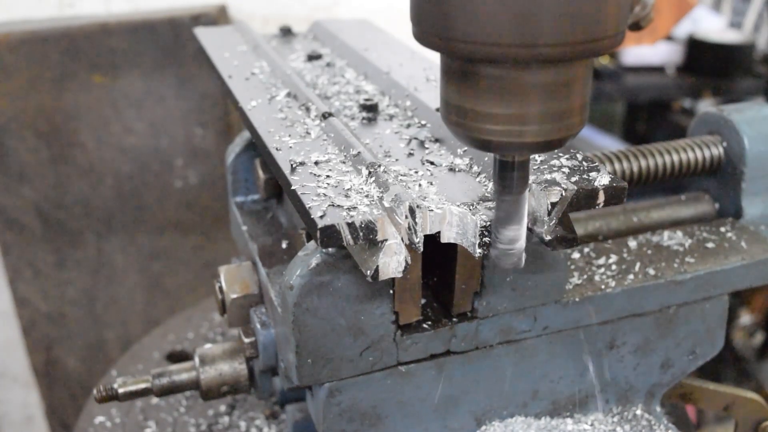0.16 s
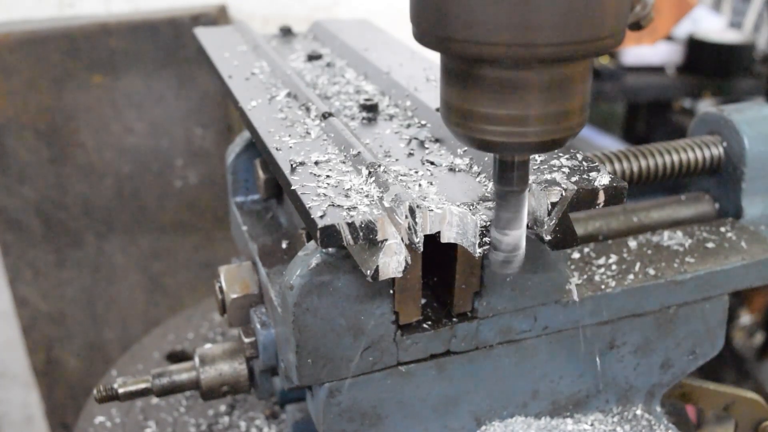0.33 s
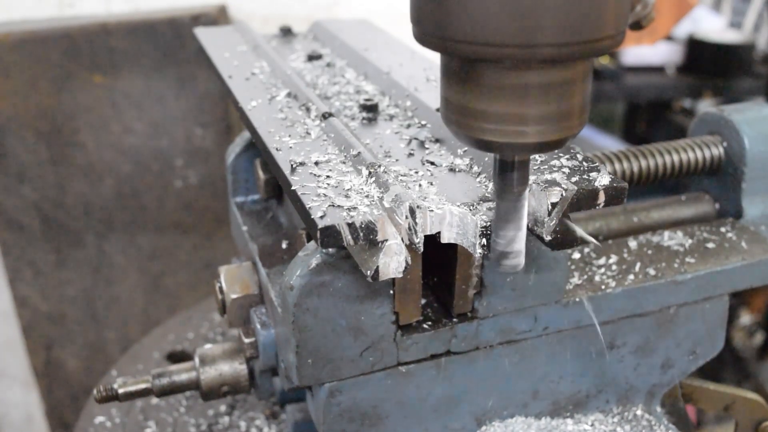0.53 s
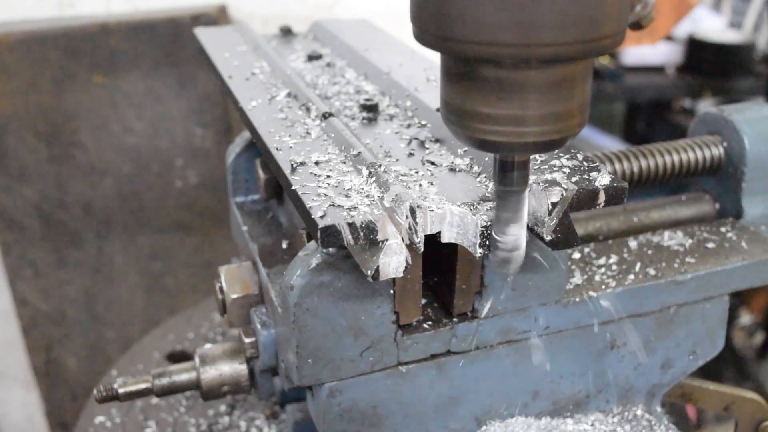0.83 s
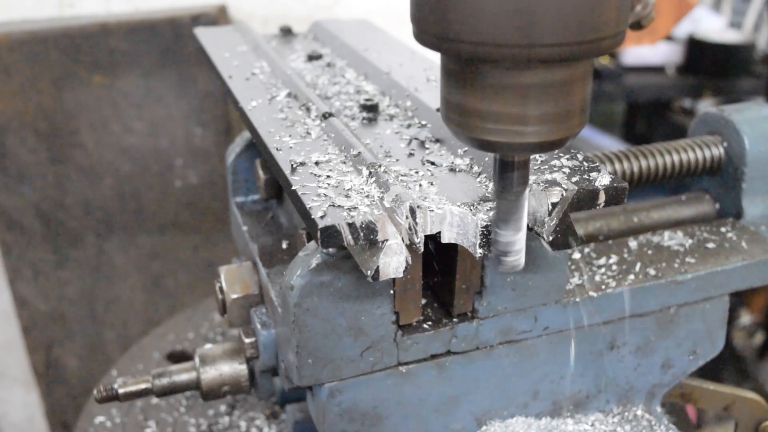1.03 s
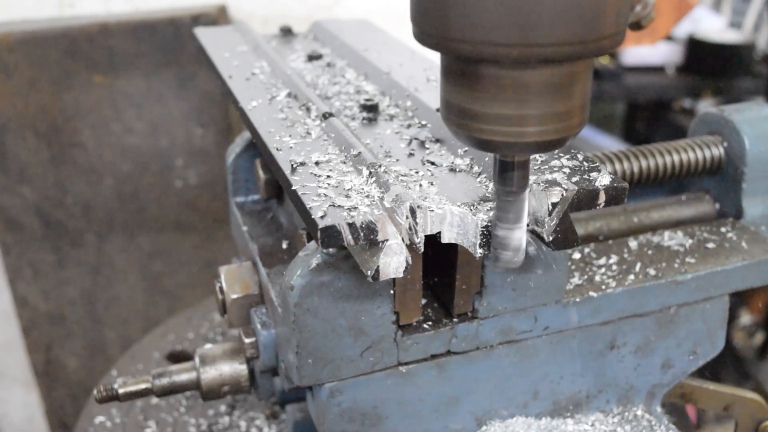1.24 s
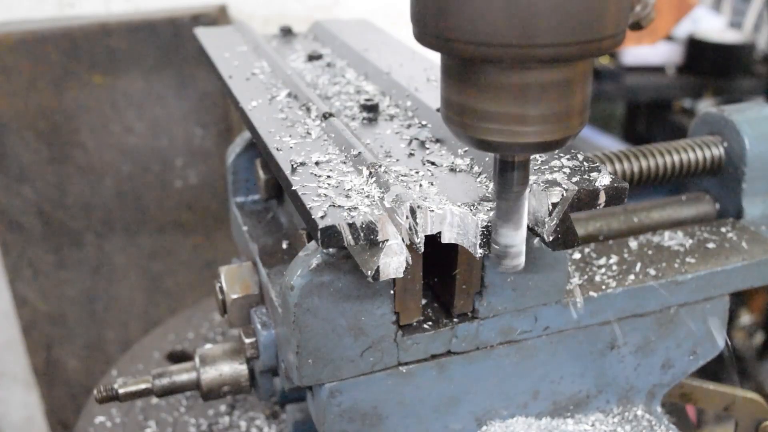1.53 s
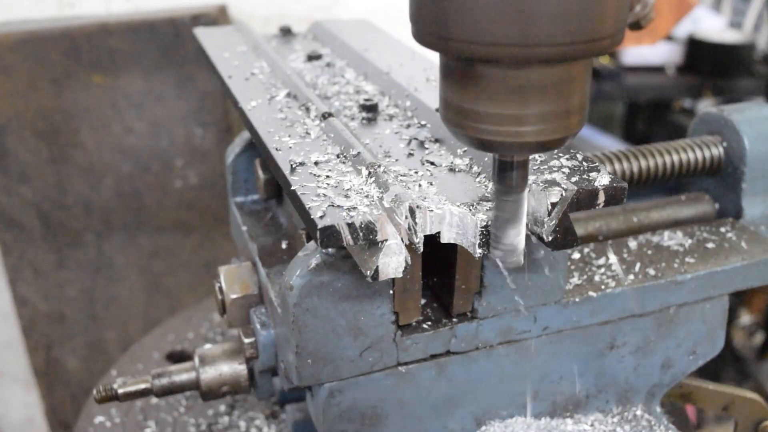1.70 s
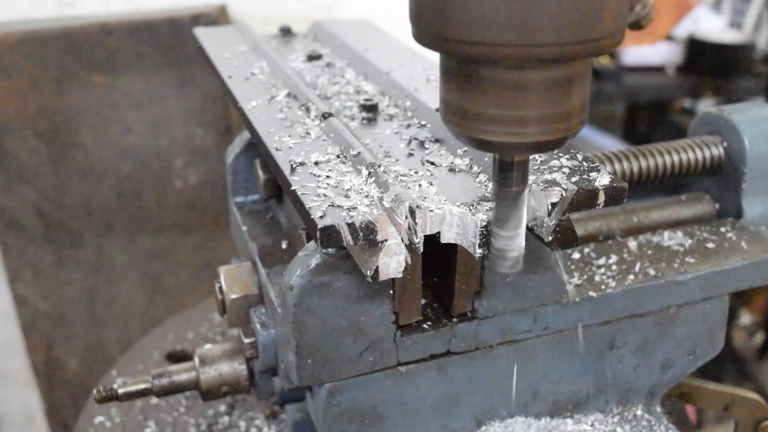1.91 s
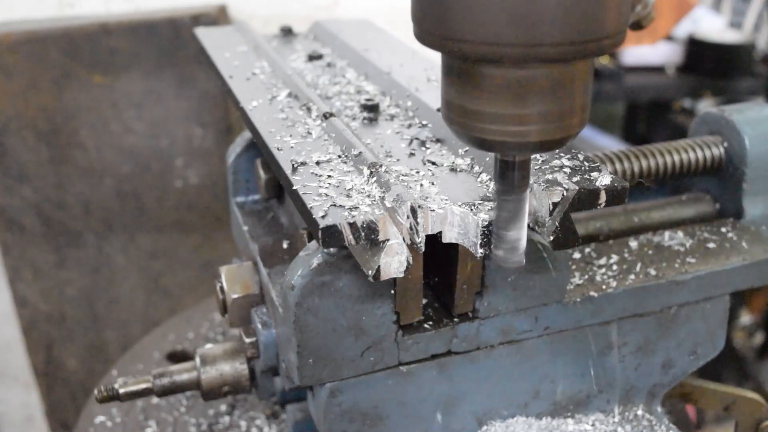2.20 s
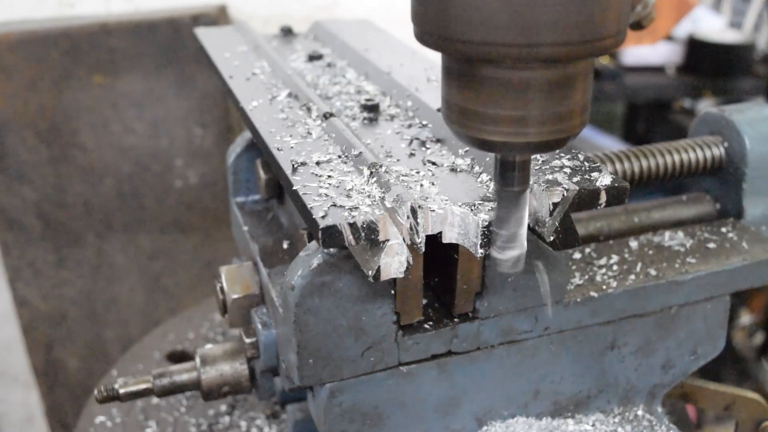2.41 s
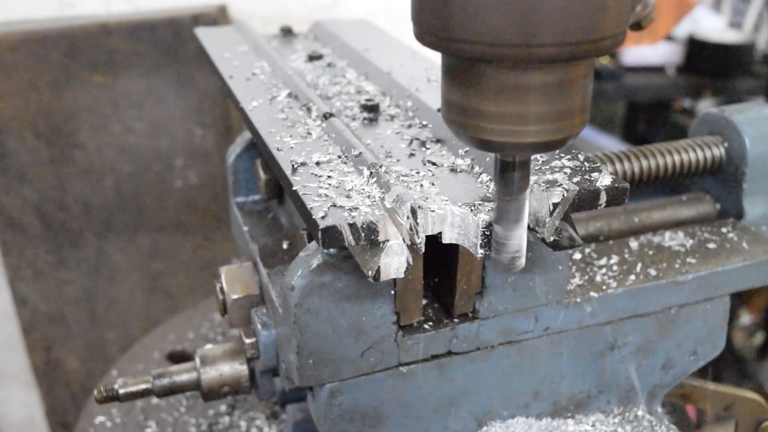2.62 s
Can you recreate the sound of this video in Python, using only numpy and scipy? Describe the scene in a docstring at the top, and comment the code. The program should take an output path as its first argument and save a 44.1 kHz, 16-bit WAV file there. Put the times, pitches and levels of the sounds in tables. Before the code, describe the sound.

A drill press mills a metal plate in a vise with a fast, pulsing rasp and a wavering ring. The motor hums beneath while small chips tinkle and sharp ticks ring out, heard close up at a workshop bench.

```python
"""A pulsing metallic rasp over a wavering ring: a drill press mills a plate with a four-flute cutter.
Each flute strikes and scrapes, exciting the resonances of the plate in its vise. Column, vise and
bench vibrate at multiples of the spindle rate, column and vise swelling as the feed presses harder.
The motor hums beneath, chips tinkle off, and hard bites and tooth ticks ring out briefly.
A small microphone close by drops the deep bass."""
import sys
import numpy as np
from scipy import signal
from scipy.fft import rfft, irfft
from scipy.io import wavfile
from scipy.ndimage import uniform_filter1d

SR = 44100
rng = np.random.default_rng(int(sys.argv[2]) if len(sys.argv) > 2 else 0)


def int16_out(signal):
    """Quantize to a 16-bit WAV file."""
    q = np.round(np.clip(np.atleast_2d(signal).T, -1, 1) * 32767)
    wavfile.write(sys.argv[1], SR, q.astype(np.int16))


N = 121275

SPINDLE_HZ, FIRST_FLUTE_S = 21.92, .0235
PING_SAMPLES = 2000
# ringing of the machine: (time [s], column level [dB], vise level [dB], run-out level [dB])
RING_LEVELS = [(0.0, -48, -35, -37.5), (0.12, -62, -70, -37), (0.14, -46, -59, -64),
               (0.24, -32.5, -40, -41), (0.45, -60, -40, -47), (0.48, -55, -61, -55), (0.54, -57, -56, -49),
               (0.6, -50, -69, -43), (0.69, -38, -47, -50), (0.76, -46, -39, -41), (0.8, -39, -56, -50),
               (0.84, -58, -45, -41), (0.91, -35, -37, -40.5), (1.09, -33, -34.5, -38.5),
               (1.19, -32.5, -48, -56), (1.25, -42, -46, -37.5), (1.36, -32, -45, -39),
               (1.39, -37, -73, -54), (1.48, -35.5, -54, -42), (1.51, -42.5, -57, -44),
               (1.71, -44, -37.5, -41), (1.81, -37.5, -47, -44), (1.83, -33.5, -48, -51),
               (1.88, -41, -63, -54), (1.94, -31, -40, -48), (2.01, -32, -44, -41), (2.07, -24.5, -32, -44),
               (2.14, -29.5, -42, -36), (2.17, -23.5, -29.5, -45), (2.24, -29, -37, -37),
               (2.29, -26.5, -33, -36), (2.4, -39.5, -35, -41), (2.44, -30.5, -34, -33),
               (2.63, -41, -45, -47), (2.67, -39, -51, -42), (2.75, -43, -47, -52)]


def amp(db):
    """Decibels to amplitude."""
    return 10 ** (np.asarray(db) / 20)


def unit_rms(x):
    """Normalisation to rms 1."""
    return x / np.sqrt(np.mean(abs(x) ** 2) + 1e-20)


def curve(table, column):
    """Linear interpolation of one column over time."""
    table = np.array(table)
    return np.interp(np.arange(N) / SR, table[:, 0], table[:, column])


def drift(rate_hz):
    """Low-pass noise: a smooth random drift of rms 1."""
    hz = np.fft.rfftfreq(N, 1 / SR)
    return unit_rms(irfft(rfft(rng.standard_normal(N)) * np.exp(-(hz / rate_hz) ** 2), N))


def coloured_noise(spectrum, patch_db):
    """Spectral shaping: noise of rms 1 whose level varies in patches of time and frequency."""
    frames, bin_hz = N // 256 + 5, np.fft.rfftfreq(1024, 1 / SR)
    real, imag, patches = rng.standard_normal((frames, 513, 3)).T
    patches = unit_rms(uniform_filter1d(uniform_filter1d(patches, size=14, axis=0), size=6, axis=1))
    hz, db = np.transpose(spectrum)
    colour_db = np.interp(np.log(bin_hz + 1), np.log(hz), db)[:, None]
    bins = (real + 1j * imag) * amp(colour_db + patch_db * patches)
    return unit_rms(signal.istft(bins, nperseg=1024, noverlap=768)[1][:N])


def resonate(x, hz, width_hz):
    """Resonance: a double pole gives steep skirts and unit gain at the centre."""
    carrier = np.exp(2j * np.pi * hz * np.arange(len(x)) / SR)
    r = np.exp(-np.pi * width_hz / SR)
    return 2 * (carrier * signal.lfilter([(1 - r) ** 2], [1, -2 * r, r * r], x / carrier)).real


def ping(hz, t60):
    """Free vibration: one struck mode decays exponentially."""
    t = np.arange(PING_SAMPLES) / SR
    return np.minimum(t / 0.00034, 1) * amp(-60 * t / t60) * np.sin(2 * np.pi * hz * t)


def impacts(events, t60, modes=((1, 1),)):
    """Modal superposition: each impact rings the modes, given as (frequency ratio, gain)."""
    out = np.zeros(N + PING_SAMPLES)
    for start, db, hz in events:
        ring = sum(gain * ping(hz * ratio, t60) for ratio, gain in modes)
        out[round(start * SR):][:PING_SAMPLES] += amp(db) * ring
    return out[:N]


def turns():
    """Uniform rotation: the spindle angle in turns."""
    return SPINDLE_HZ * (np.arange(N) / SR - FIRST_FLUTE_S) + 1


def spindle_tones(orders, level_db):
    """Modulation: every fourth order is a flute harmonic; the off-centre cutter adds sidebands."""
    runout_peak, phase_spread = 0.045, .15  # turns
    tones = 0
    for order, db in orders:
        waver = 1 + .13 * (drift(rate_hz=5) + 1j * drift(rate_hz=5))  # in strength and phase
        sideband = (order + 1) % 4 - 1
        slip = (sideband != 0) * phase_spread * rng.standard_normal()
        phase = order * turns() + slip - runout_peak * sideband
        tones += amp(db) * (waver * np.exp(2j * np.pi * phase)).real
    return amp(level_db) * unit_rms(tones)


def machine_ring():
    """Forced vibration: column, vise and cutter run-out sound at multiples of the spindle rate."""
    # partials of each: (spindle order, relative level [dB])
    column = [(35, -14), (36, 0), (37, -18), (38, -17), (39, -13), (40, -13), (41, -13), (44, -22),
              (48, -17)]
    vise = [(28, -11), (32, 0)]
    runout = [(29, -18), (30, -6), (31, 0)]
    return sum(spindle_tones(orders, curve(RING_LEVELS, k))
               for k, orders in enumerate([column, vise, runout], start=1))


def bench_ring():
    """Structure-borne sound: table and bench carry low spindle orders and a resonant rasp."""
    # bench partials: (spindle order, relative level [dB])
    orders = [(20, -4), (21, -9), (22, -7), (23, -7), (24, 0), (28, -7)]
    # bench vibration: (time [s], level [dB])
    levels = [(0.03, -50.5), (0.14, -45), (0.16, -50), (0.3, -45), (0.46, -50.5), (0.56, -41.5),
              (0.58, -42), (0.67, -46), (0.69, -41.5), (0.78, -46), (1.17, -44), (1.59, -47), (1.84, -45.5),
              (1.94, -47.5), (2.31, -47), (2.72, -44.5)]
    level_db = curve(levels, 1)
    rasp = unit_rms(resonate(rng.standard_normal(N), hz=509, width_hz=84))
    return spindle_tones(orders, level_db) + amp(level_db - 3) * rasp


def plate(drive, load_db):
    """Modal response of plate and vise; the low modes swell slightly with the load."""
    # resonances: (frequency [Hz], width [Hz], relative level [dB])
    modes = [(683.7, 29, -8), (862, 147, -2.5), (1042, 260, -6), (1428, 550, -3.5), (2040, 348, 0.5),
             (2280, 245, -3.5), (2658, 630, 1), (3430, 124, -15)]
    out = 0
    for k, (hz, width, db) in enumerate(modes):
        swell_db = 0.028 * load_db * (hz < 1200)
        out += (-1) ** k * amp(db + swell_db) * unit_rms(resonate(drive, hz, width))
    return unit_rms(out)


def cutter():
    """Impact and friction: each flute strikes, then scrapes the plate; a sizzle pulses just behind."""
    # uneven bite of the four flutes: (relative level [dB])
    flute_db = [5, 8.5, -4, 4.5]
    # strike of each flute, two standing proud: (relative level [dB])
    strike_db = [1.5, -2.5, 2, -3]
    # cutting noise: (time [s], scrape level [dB], low sizzle level [dB], high sizzle level [dB])
    levels = [(0.04, -28.5, -34.5, -42), (0.79, -29.5, -37, -43), (1.09, -27.5, -34.5, -40.5),
              (1.27, -30, -35.5, -46), (1.28, -33, -36, -41), (1.3, -26, -30.5, -39),
              (1.31, -29.5, -36.5, -43.5), (1.39, -29, -33, -41), (1.43, -30, -36.5, -41.5),
              (1.82, -30, -36, -42.5), (1.98, -28.5, -36.5, -42), (2.22, -25, -31.5, -39),
              (2.3, -27, -34.5, -43), (2.34, -26, -33.5, -39), (2.64, -30, -39, -42.5),
              (2.7, -31, -37.5, -43)]
    # friction sizzle: (frequency [Hz], relative level [dB])
    spectrum = [(1760, -33), (3000, -1.5), (3190, 0.5), (3490, 9), (4010, 1), (4360, 4), (5080, -1),
                (5750, 2), (7330, -8.5), (7960, -1), (9080, 0), (12700, -13.5), (14500, -12)]
    rise, decay = 0.36, 0.44  # shares of a flute's pass
    passes, place = np.floor(4 * turns()).astype(int), 4 * turns() % 1
    flute = passes % 4
    scatter = np.clip(rng.standard_normal((passes.max() + 1, 4)), -2, 2)[passes].T
    envelope = np.minimum(place / rise, 1) * np.exp(-place / decay)
    bite = amp(np.array(flute_db)[flute] + 1.8 * scatter) * envelope

    column_db = curve(RING_LEVELS, 1)
    load_db = uniform_filter1d(column_db - column_db.mean(), size=4000)  # follows the column's ring
    strikes = np.diff(passes, prepend=passes[0]) * amp(np.array(strike_db)[flute] + 0.5 * scatter[1])
    friction = (1 + bite[0]) * rng.standard_normal(N)
    drive = unit_rms(friction) + amp(-8.5 + .38 * load_db) * unit_rms(strikes)

    sizzle = coloured_noise([(1500, -23.0)] + spectrum[1:], patch_db=0.5)  # faint up to 1500 Hz
    low_band = signal.oaconvolve(sizzle, signal.firwin(63, 7000, fs=SR), "same")
    low_sizzle = unit_rms((1 + np.roll(bite[2], 60)) * low_band)
    high_sizzle = unit_rms((1.4 + np.roll(bite[3], 200)) * (sizzle - low_band))
    layers = [plate(drive, load_db), low_sizzle, high_sizzle]
    return sum(amp(curve(levels, k)) * layer for k, layer in enumerate(layers, start=1))


def small_chips():
    """Shot noise: chips break off at random and ring the high modes of cutter and plate."""
    # high modes: (frequency [Hz], relative level [dB])
    modes = [(3400, -11), (4430, -1), (5190, 3.5), (5600, -0.5), (6420, -2.5), (6900, -1.5), (7720, -3),
             (8120, -3), (8840, -10.5), (9760, -11), (11400, -16.5)]
    chips_per_s, detune = 2200, 0.03
    size_db = -39 + 2 * np.minimum(rng.exponential(1, N), 3)
    impulses = amp(size_db) * (rng.random(N) < chips_per_s / SR)
    struck_mode = rng.integers(0, 3 * len(modes), N)
    out = np.zeros(N)
    for k, (hz, db) in enumerate(3 * modes):  # three tunings of each mode
        tone = amp(db) * ping(hz * (1 + detune * rng.standard_normal()), t60=0.018)
        out += signal.oaconvolve(impulses * (struck_mode == k), tone)[:N]
    return out


def motor():
    """Line and continuous spectra: hum tones over the rumble of motor, belt and bearings."""
    # tones of motor and drive: (frequency [Hz], rms level [dB], waver [dB])
    lines = [(240, -46, .9), (263.4, -50.5, 2.5), (330, -60, 1.5), (350, -62, 1.5), (176, -68, 2),
             (155, -75, 2), (220, -65, 2), (286, -64, 2), (395, -64, 3), (417, -65, 3)]
    # rumble spectrum: (frequency [Hz], relative level [dB])
    rumble = [(30, -62), (60, -62), (100, -60), (140, -40), (190, -12), (290, -4), (400, -8), (560, -6.5),
              (730, 4), (1000, 1), (1300, -17.5), (2000, 0), (3000, -15), (4000, -9.5), (8000, -59)]
    t = np.arange(N) / SR
    hum = sum(np.sqrt(2) * amp(db + waver_db * drift(rate_hz=5)) * np.sin(2 * np.pi * hz * t)
              for hz, db, waver_db in lines)
    return hum + amp(-41) * coloured_noise(rumble, patch_db=4.4)


def hard_bites():
    """Impulse response: the hardest bites each ring one mode near 2 kHz."""
    # bites: (time [s], level [dB], frequency [Hz])
    events = [(0.0443, -21, 2170), (0.1146, -21, 2130), (0.163, -18.5, 1980), (0.2034, -18, 2000),
              (0.2533, -19, 2040), (0.2887, -23, 2120), (0.297, -22, 2070), (0.345, -20, 2030),
              (0.3905, -22, 2080), (0.399, -18, 2100), (0.4898, -26, 2050), (0.499, -16.5, 2060),
              (0.534, -25, 2150), (0.613, -22.5, 1910), (0.7238, -32, 2100), (0.8649, -26, 2200),
              (0.9812, -14, 2050), (1.0271, -21, 2080), (1.1124, -16.5, 2040), (1.1588, -22, 2020),
              (1.296, -20.5, 2050), (1.3418, -19, 2050), (1.3862, -23, 2050), (1.8906, -23, 2050),
              (1.933, -18, 2100), (1.9814, -21, 2140), (2.0273, -15.5, 2030), (2.0682, -16, 2130),
              (2.088, -18, 2050), (2.131, -26, 2050), (2.1655, -18, 1930), (2.178, -29, 1910),
              (2.2114, -13, 1970), (2.2253, -14, 1920), (2.2573, -17, 1970), (2.3361, -21, 2040),
              (2.3585, -18, 1770), (2.3885, -17, 2060), (2.4324, -15.5, 2100), (2.4957, -17.5, 2130),
              (2.5416, -16, 2040)]
    return impacts(events, t60=0.027)


def tooth_ticks():
    """Heavy damping: a tooth hits the plate and two modes die within milliseconds."""
    # ticks: (time [s], lower mode level [dB], lower mode frequency [Hz])
    events = [(0.0443, -27, 2730), (0.0907, -25, 3390), (0.116, -16, 2720), (0.1361, -18, 3400),
              (0.159, -17, 2560), (0.18, -22, 3400), (0.205, -23, 2830), (0.2773, -27, 2710),
              (0.408, -23, 2580), (0.4544, -17, 2740), (0.4918, -14, 2550), (0.529, -19, 2760),
              (0.544, -14, 2620), (0.6584, -24, 2820), (0.6799, -20, 2520), (0.8036, -20, 2600),
              (0.847, -24, 2730), (0.8934, -24, 2790)]
    return impacts(events, t60=.005, modes=[(1, 1), (1.55, amp(-4))])


def large_chips():
    """Beating: a large chip breaks off and rings a close pair of modes."""
    # chips: (time [s], level [dB], frequency between the pair [Hz])
    events = [(.0454, -31, 3370), (.0578, -15, 5600), (0.091, -17, 3250), (0.1352, -17, 3460),
              (0.181, -21, 3400), (0.191, -24, 4900), (.4494, -16, 4770), (.681, -19, 3280),
              (.723, -19, 5400), (.812, -23, 5850), (.836, -26, 5300), (0.85, -21, 4400),
              (0.896, -24, 4530), (.953, -18, 3540), (1.0692, -17, 5190), (1.26, -23, 4370),
              (1.289, -19, 6230), (1.3404, -20, 3700), (1.4594, -21, 8500), (1.505, -22, 9000),
              (1.599, -21, 7900), (1.6444, -29, 8100), (1.69, -25, 7800), (1.7394, -26, 8100),
              (1.7839, -22, 7950), (1.829, -21, 8150), (1.8744, -22, 8160), (1.9344, -26, 8000),
              (2.0867, -16.5, 5200), (2.166, -21, 5150), (2.211, -19, 4300), (2.3354, -20, 5330),
              (2.4205, -19, 7360), (2.5202, -18, 5200), (2.6455, -26, 8000), (2.69, -23, 8300),
              (2.736, -19, 7550)]
    return impacts(events, t60=0.015, modes=[(0.92, .5), (1.043, .5)])


def scene():
    """Superposition: all sources add in one channel."""
    sustained = machine_ring() + bench_ring() + cutter() + small_chips() + motor()
    return (sustained + hard_bites() + tooth_ticks() + large_chips())[None]


def record(dry):
    """Band limiting: the small microphone drops the deep bass, and the highest treble is cut."""
    thin = signal.sosfilt(signal.butter(4, 130, "highpass", fs=SR, output="sos"), dry)
    lowpass = signal.firwin(1023, 15730, window=("kaiser", 10), fs=SR)
    return signal.oaconvolve(thin, lowpass[None], "same")


dry = scene()
out = record(dry)
int16_out(out)
```